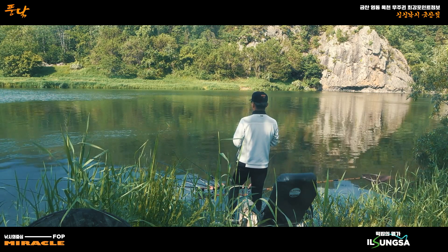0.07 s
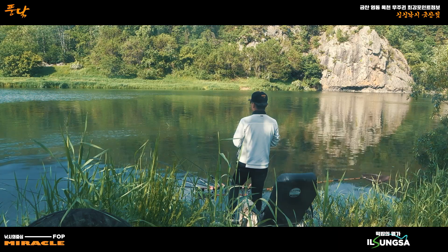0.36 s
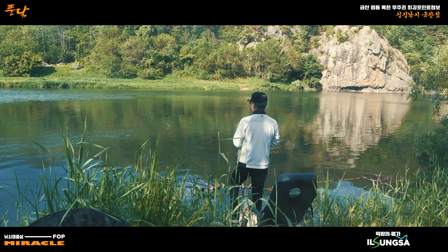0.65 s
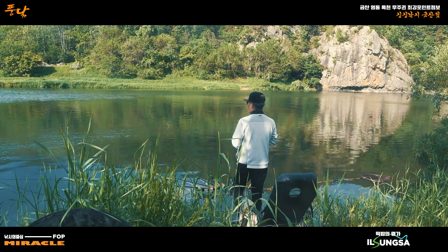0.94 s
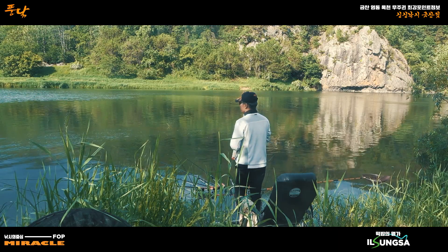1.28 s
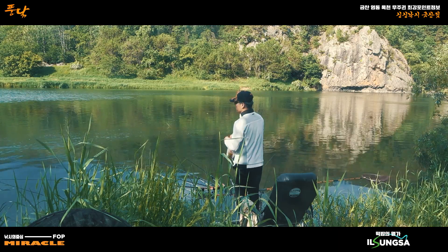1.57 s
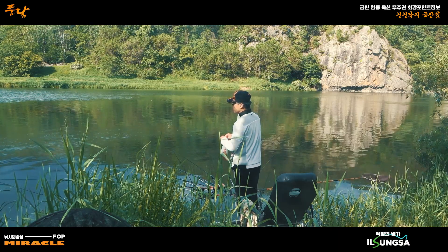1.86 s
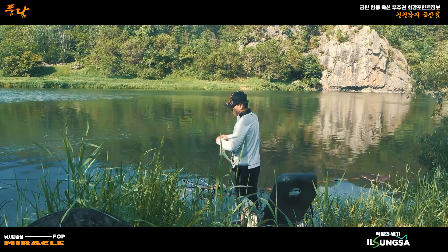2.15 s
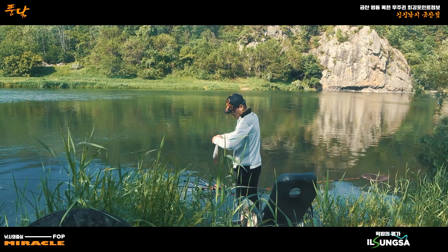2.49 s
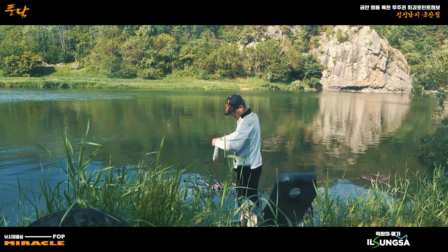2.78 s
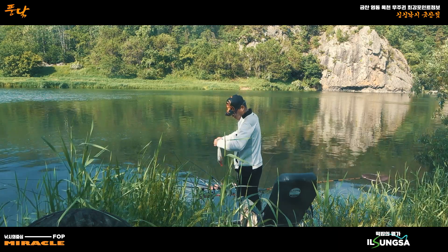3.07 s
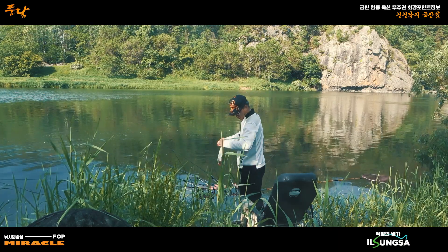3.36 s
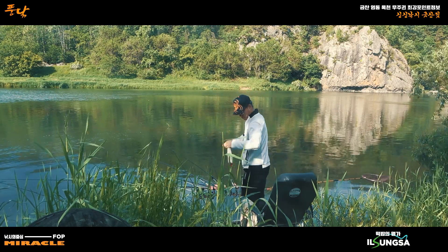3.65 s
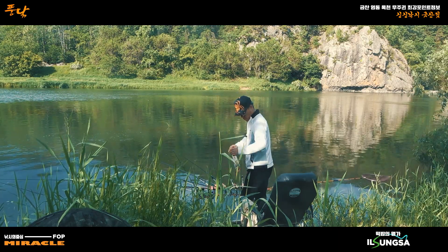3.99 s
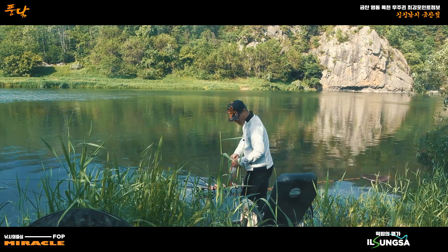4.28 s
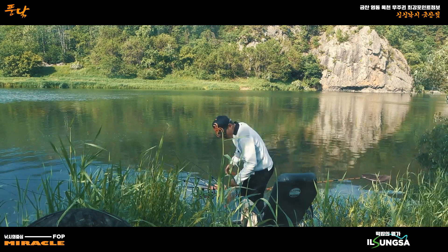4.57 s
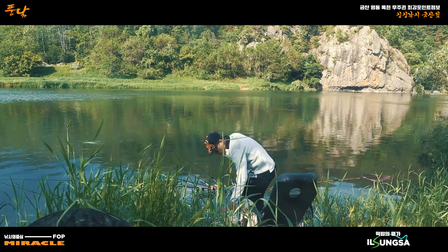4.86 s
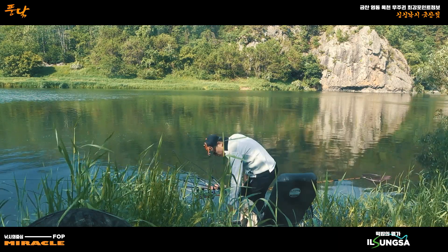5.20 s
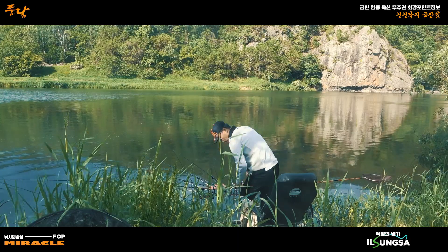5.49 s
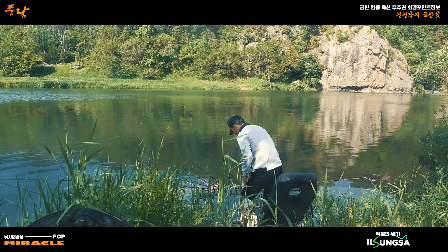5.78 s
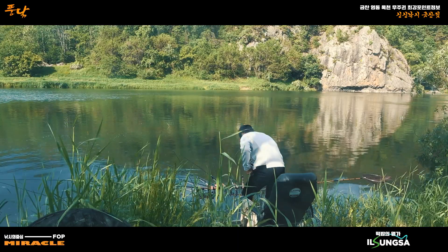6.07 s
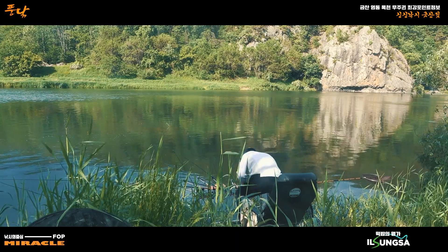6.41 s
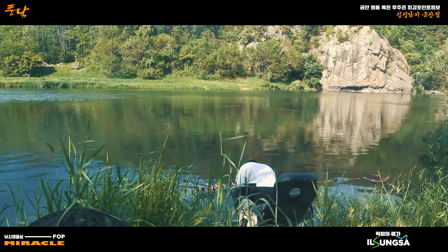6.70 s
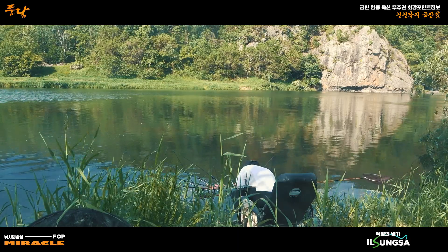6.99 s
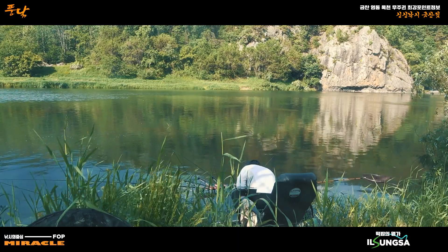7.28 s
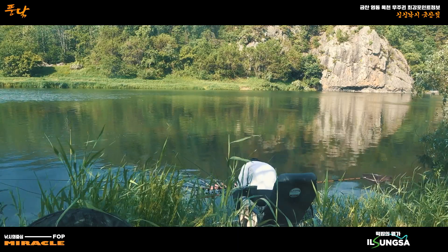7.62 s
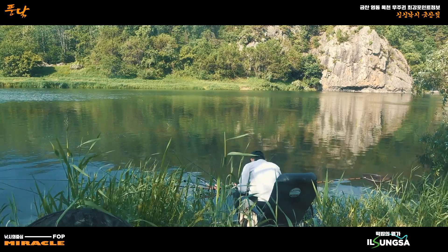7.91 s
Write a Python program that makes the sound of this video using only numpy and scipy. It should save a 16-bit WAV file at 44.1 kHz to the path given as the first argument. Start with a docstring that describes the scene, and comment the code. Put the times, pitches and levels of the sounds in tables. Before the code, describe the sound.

On a windy river bank, reed leaves scrape over cloth and snap crisply right by a microphone worn on a jacket, while gusts rumble against it. The crackling thins out, with one sharp crack after about five seconds. Then come short rasps, soft knocks on the microphone and tiny water plips. The strongest gusts arrive near the end, over a faint murmur of water and foliage.

```python
"""A windy river bank, heard from a small microphone on an angler's jacket, long reed leaves within reach.
For the first six seconds he handles them: leaves and cloth scrape, hiss and snap, and early gusts
buffet the capsule. From about five seconds he crouches: ribbed cloth or stems rasp past, the jacket
bumps the microphone, then water plips at the edge. The strongest gusts come near the end.
Farther off, the bank murmurs faintly throughout."""
import sys
import numpy as np
from scipy import signal
from scipy.fft import rfft, irfft, next_fast_len
from scipy.io import wavfile
from scipy.ndimage import uniform_filter1d, minimum_filter1d, map_coordinates

SR = 44100
rng = np.random.default_rng(int(sys.argv[2]) if len(sys.argv) > 2 else 0)


def transcribe(signal):
    """Save signal, clipped to [-1, 1], as a 16-bit WAV file at the path in sys.argv[1]."""
    frames = np.atleast_2d(signal).T
    limited = np.clip(frames, -1, 1)
    pcm = np.round(limited * 32767).astype(np.int16)
    wavfile.write(sys.argv[1], SR, pcm)


N = 355005
TIME = np.arange(N) / SR

# Strokes of leaves over cloth, close to the microphone; a firm stroke is brighter. Levels are relative.
# start_s, length_s, scrape_db, hiss_db, bright_db
LEAF_STROKES = [(0.0, 0.23, -34, -43.5, -0.5), (0.067, .21, -22.5, -36, 1.5), (0.32, 0.14, -29, -42, -1),
                (0.438, 0.089, -24.5, -44, 0.5), (0.574, .18, -38, -44.5, -3.5), (0.743, .11, -33, -30, 1),
                (0.857, 0.03, -36.5, -43, 5), (0.957, 0.028, -37.5, -50, -1), (1.032, 0.18, -52, -45, -6),
                (1.166, 0.033, -31, -52, 1), (1.266, 0.27, -53.5, -51.5, -3), (1.582, 0.15, -42, -47, -6),
                (1.814, 0.1, -42, -50.5, 1), (2.004, 0.14, -43, -51, -5), (2.277, 0.12, -42, -49.5, -1.5),
                (2.43, 0.087, -52.5, -74, -10), (2.656, 0.16, -38, -48, 2.5), (2.822, 0.14, -39.5, -47, 3),
                (3.016, 0.043, -41.5, -53, -1.5), (3.071, 0.076, -34, -45, 4),
                (3.195, 0.043, -42, -45.5, 1), (3.349, 0.21, -36.5, -43, 2.5),
                (3.72, 0.071, -40, -40.5, 1.5), (3.818, 0.26, -55, -73, -7), (4.023, 0.054, -41.5, -48, 2),
                (4.159, 0.07, -51.5, -76, -13.5), (4.3, 0.062, -39.5, -56, 0.5),
                (4.404, 0.049, -33, -38, 7), (4.469, 0.098, -45.5, -39.5, -0.5),
                (4.59, 0.059, -46.5, -60, 1), (4.73, 0.19, -48, -50, 3), (4.95, 0.12, -56, -59.5, 3),
                (5.063, 0.055, -43, -38.5, 5.5), (5.153, .08, -40.5, -39.5, 9), (5.209, 0.11, -29, -36, 11),
                (5.372, 0.095, -46.5, -46.5, 0), (6.572, .085, -45, -48, -2), (6.647, 0.044, -45, -39.5, 3),
                (7.07, 0.045, -53, -60, -9), (7.229, 0.02, -41, -47.5, -1), (7.31, 0.048, -70, -46, -2),
                (7.572, 0.079, -48, -57, 1)]


def handling():
    """Scrape, hiss and brightness in dB: each stroke rises, holds, drops, and the leaves slide on faintly."""
    attack_s, release_s, linger_s = 0.013, 0.013, 0.15
    linger = amp(-14.5)
    power = np.full((2, N), 1e-10)
    firmness = np.zeros(N)
    for start_s, length_s, scrape_db, hiss_db, bright_db in LEAF_STROKES:
        first = max(round(start_s * SR), 0)
        t = TIME[first:first + SR] - start_s
        after = np.maximum(t - length_s, 0)
        release = (1 - linger) * np.exp(-after / release_s) + linger * np.exp(-after / linger_s)
        envelope = np.clip(t / attack_s, 0, 1) * release
        stroke = (amp([[scrape_db], [hiss_db]]) * envelope) ** 2
        power[:, first:first + SR] += stroke
        firmness[first:first + SR] += bright_db * stroke[0]
    scrape_db, hiss_db = 10 * np.log10(power)
    return scrape_db, hiss_db, firmness / power[0]


# Tone of the scraping blades and of their hissing ribs, at close range: freq_hz, gain_db
SCRAPE_SPECTRUM = [(60, -6), (150, 5), (330, 4), (520, 2.5), (780, -9), (1150, -4), (1700, -9.5),
                   (2500, -13.5), (4000, -22.5), (8000, -47), (16000, -29)]
HISS_SPECTRUM = [(800, -34), (2000, 0), (3500, -5), (5500, 3.5), (8000, -0.5), (10500, -4), (12000, -9),
                 (16000, -18)]


def rubbing(scrape_db, hiss_db, bright_db):
    """Leaves drag in clumps of slips: a dull, crinkly scrape from the blades, a fine hiss from the ribs."""
    grip = np.clip(wobble(110), -1.5, 1.5)
    folds = crinkles(count=4200, centre_hz=1400, cycles=3, spread_db=4)
    friction = slips(per_s=1300, spread_db=1.0, smooth=0.38)
    scrape = coloured(folds + 2.24 * friction, SCRAPE_SPECTRUM) * unit(amp(2.4 * grip))
    # firmer contact shortens the slips and shifts their energy upward
    dull = filtered(scrape, lambda hz: 1 / (1 + (hz / 1000) ** 4))
    scrape = amp(-0.6 * bright_db) * dull + amp(0.46 * bright_db) * (scrape - dull)
    ribs = patchy(slips(per_s=3500, spread_db=5, smooth=0.9), depth_db=2.5, width_bins=5)
    flutter = unit(amp(1.6 * grip + 2.2 * wobble(300)))
    hiss = flutter * coloured(ribs, HISS_SPECTRUM)
    return amp(scrape_db + 4.0) * scrape + amp(hiss_db - 3.5) * hiss


def crinkles(count, centre_hz, cycles, spread_db):
    """Many tiny folds give way, each ringing for a few cycles at its own pitch."""
    start = rng.integers(0, N, (count, 1))
    pitch, strength, sign = np.clip(rng.standard_normal((count, 3)), -2, 2).T[..., None]
    step = np.arange(300)
    turns = centre_hz * np.exp(0.7 * pitch) * step / SR
    decay = np.exp(-turns / cycles) * (1 - step / len(step))
    rings = np.sign(sign) * amp(spread_db * strength) * np.sin(2 * np.pi * turns) * decay
    return unit(np.bincount((start + step).ravel(), rings.ravel(), N)[:N])


def slips(per_s, spread_db, smooth):
    """Tiny stick-slip impulses of uneven size, over a share of smooth friction."""
    sizes = amp(spread_db * np.clip(rng.standard_normal(N), -2, 2)) * rng.choice([-1, 1], N)
    impulses = unit(sizes * (rng.random(N) < per_s / SR))
    return unit(impulses + smooth * rng.standard_normal(N))


# Leaves and folds buckling right by the microphone: start_s, crack_db, crack_hz, flap_db, flap_hz
LEAF_SNAPS = [(.095, -31, 2800, -35, 800), (.123, -51, 2380, -26.5, 900), (.1489, -23, 3300, -15, 526),
              (0.1585, -36, 2300, -23, 620), (.2339, -15, 4080, -25.5, 600), (0.273, -30, 3240, -19, 510),
              (0.288, -25.5, 2580, -17, 470), (0.3652, -60.5, 2800, -17.5, 940),
              (0.3798, -30, 2600, -27, 850), (0.4432, -26, 2850, -24, 420), (0.469, -25, 4240, -23.5, 800),
              (0.526, -23.5, 4800, -23.5, 1010), (0.539, -22, 3790, -17, 824), (.653, -21, 4370, -17, 775),
              (0.689, -41, 2900, -17, 724), (0.7516, -36.5, 2610, -20, 620), (0.8148, -19, 4950, -21, 543),
              (0.8517, -13, 6650, -41, 700), (.8804, -33, 2400, -22.5, 980),
              (0.9338, -32, 3100, -24.5, 1570), (0.9663, -50, 2700, -24, 695),
              (1.0454, -33, 4930, -32.5, 630), (1.206, -30.5, 2380, -23, 595),
              (1.218, -27, 3810, -22, 1160), (1.2434, -26, 3120, -28.5, 1050),
              (1.2706, -34.5, 3600, -33.5, 450), (1.77, -44.5, 5030, -43.5, 700),
              (1.5871, -21, 2840, -36, 590), (1.605, -30.5, 2960, -27.5, 745),
              (1.6135, -27, 3260, -27, 510), (1.6652, -54.5, 2500, -26.5, 442),
              (1.711, -42, 2480, -30, 597), (1.855, -23, 3000, -23.5, 1310), (1.865, -24, 3300, -18, 427),
              (2.0397, -24, 4430, -26, 970), (2.116, -17, 2440, -23.5, 910), (2.211, -43, 4000, -43, 1000),
              (2.2178, -22.5, 6150, -33, 1090), (2.281, -62, 2500, -28, 526),
              (2.3013, -39, 2600, -28.5, 460), (2.3812, -51, 2640, -31, 1120), (2.453, -55, 2600, -36, 695),
              (2.5088, -69, 2470, -37.5, 674), (2.604, -37.5, 2570, -32, 905),
              (2.6772, -41, 2700, -25, 855), (2.689, -34, 2400, -22, 980),
              (2.7053, -25.5, 3040, -25.5, 587), (2.7913, -27.5, 2950, -21.5, 1110),
              (2.8169, -18.5, 3100, -17, 660), (2.863, -28, 3400, -24.5, 586),
              (2.8993, -21.5, 3380, -22.5, 810), (2.962, -35, 3100, -36, 1190),
              (3.0298, -49, 2430, -27, 710), (3.1347, -66, 2300, -26, 720),
              (3.2128, -41.5, 2800, -26.5, 625), (3.2262, -57, 3000, -29, 820),
              (3.286, -47, 3500, -29, 745), (3.305, -24, 3030, -25.5, 840), (3.4581, -31, 4000, -29, 910),
              (3.4717, -25, 4600, -27.5, 680), (3.5842, -28, 4900, -27, 820),
              (3.762, -27.5, 5000, -34.5, 510), (3.8131, -26, 3200, -29, 1340),
              (3.923, -52, 2200, -37.5, 695), (4.1704, -63, 2500, -26.5, 950), (4.223, -66, 2020, -63, 480),
              (4.357, -42, 2300, -26, 1090), (4.399, -29.5, 3300, -28.5, 900),
              (4.4075, -41, 2600, -24, 870), (4.495, -30, 5300, -41, 590), (4.607, -36, 3460, -50, 530),
              (4.6291, -47, 3800, -24, 710), (4.6354, -25.5, 3920, -28.5, 790),
              (5.095, -36, 3230, -32.5, 1150), (5.22, -20, 3800, -28.5, 1560),
              (5.2266, -6, 4300, -22, 1300), (5.3256, -26.5, 2880, -40, 840), (5.4887, -33, 3220, -55, 830),
              (5.5754, -35.5, 3840, -34, 1220), (5.8616, -45.5, 5170, -51, 900),
              (7.8898, -33, 2960, -26, 390)]


def snaps(scrape_db, hiss_db):
    """A leaf creaks under strain, buckles with a sharp crack, then its blade flaps for a few milliseconds."""
    lead_s = 0.012
    out, t = np.zeros(N), np.arange(2600) / SR - lead_s

    def dying(seconds):
        return (t >= 0) * np.exp(-np.abs(t) / seconds)

    strain = (t < 0) * np.exp(-np.abs(t) / 0.0042)
    buckle = dying(0.0008) + 0.05 * dying(0.006) + 0.03 * strain
    blade = dying(0.0038) + 0.053 * strain
    for start_s, crack_db, crack_hz, flap_db, flap_hz in [*LEAF_SNAPS, *ticks(scrape_db, hiss_db)]:
        crack_noise, flap_noise = rng.standard_normal((2, len(t)))
        top_hz = 17600 * 2 ** ((crack_db + 16.5) / 35)  # a crack 35 dB softer is an octave duller
        crack = filtered(crack_noise * buckle, lambda f: resonance(f, crack_hz, q=0.93)
                         / (1 + 1j * f / (3 * crack_hz)) / (1 + (f / top_hz) ** 4))
        flap = filtered(flap_noise * blade, lambda f: resonance(f, flap_hz, q=0.71)
                        * resonance(f, 1076, q=0.56) / (1 + 1j * f / 5000))
        add(out, start_s - lead_s, amp(crack_db) * unit_over(crack, seconds=0.0042))
        add(out, start_s - lead_s, amp(flap_db) * unit_over(flap, seconds=0.0075))
    return out


def ticks(scrape_db, hiss_db, per_s=14, spread_octaves=0.21):
    """Rows of small random buckles, whose strength follows the rubbing of the moment."""
    count = round(per_s * N / SR)
    at = rng.integers(0, N, 400)[:count]
    size_db, crack_pitch, flap_pitch = np.clip(rng.standard_normal((400, 3)), -2, 2)[:count].T
    crack_db = hiss_db[at] + 7.5 + size_db
    crack_hz = 3300 * 2 ** (spread_octaves * crack_pitch)
    flap_db = scrape_db[at] + 5.5 + size_db
    flap_hz = 780 * 2 ** (spread_octaves * flap_pitch)
    return np.column_stack([at / SR, crack_db, crack_hz, flap_db, flap_hz])


# Gusts right on the capsule: time_s, level_db
WIND_GUSTS = [(0.0, -27), (0.22, -34), (0.29, -30), (0.36, -24.5), (0.76, -32), (0.78, -24.5), (1.1, -26.5),
              (1.14, -32), (1.25, -19.5), (1.5, -21.5), (1.52, -18), (1.66, -37), (3.36, -44.5),
              (3.38, -34), (3.59, -38), (3.63, -60), (3.94, -38), (4.89, -44), (4.95, -37), (5.22, -31),
              (5.25, -20), (5.58, -33), (5.63, -26.5), (5.72, -39), (5.83, -34.5), (5.94, -49), (5.96, -37),
              (6.28, -36), (6.7, -13), (6.97, -31.5), (7.17, -24.5), (7.29, -35), (7.53, -22), (7.62, -25),
              (7.78, -11.5), (7.89, -16.5), (7.94, -13.5), (8.05, -17.5)]
# Low rumble of the buffeted microphone: freq_hz, gain_db
BUFFET_SPECTRUM = [(10, -19.5), (25, -2.5), (45, 2.5), (85, -3), (130, -8.5), (200, -23.5), (300, -35.5),
                   (500, -58.5), (1200, -74)]


def wind():
    """Eddies on the capsule; stronger flow makes smaller eddies and so reaches higher."""
    buffet_db = curve(WIND_GUSTS)
    large = coloured(rng.standard_normal(N), BUFFET_SPECTRUM) * unit(amp(2.3 * wobble(16)))
    small = filtered(rng.standard_normal(N),
                     lambda f: resonance(f, 151.5, q=1.09) ** 2 / (1 + (f / 450) ** 2))
    return amp(buffet_db) * large + amp(1.356 * buffet_db - 7.0) * unit(small)


# Tone of the thud that reaches the microphone through the jacket after a snap: freq_hz, gain_db
THUD_SPECTRUM = [(25, -10.5), (70, -2), (180, -5.5), (400, -3.5), (700, -13), (1500, -43), (4000, -64)]


def jostle(scrape_db, rise_s=0.001, decay_s=0.014):
    """Strokes and snaps also shake the jacket, and the microphone rumbles with them."""
    jolts, t = np.zeros(N), np.arange(SR // 5) / SR
    jolt = np.exp(-t / decay_s) * (1 - np.exp(-t / rise_s))
    for start_s, _, _, flap_db, _ in LEAF_SNAPS:
        add(jolts, start_s, amp(flap_db - 6) * jolt)
    rumble = amp(scrape_db - 14.5) * coloured(rng.standard_normal(N), BUFFET_SPECTRUM)
    return rumble + jolts * coloured(rng.standard_normal(N), THUD_SPECTRUM)


# Soft knocks on the microphone itself: start_s, relative_level_db, pitch_hz, t60_s
MIC_BUMPS = [(1.095, -11.5, 225, 0.027), (5.613, -22.5, 186, 0.068), (6.173, -21.5, 203, 0.073),
             (6.232, -31.5, 243, 0.05), (6.423, -27, 193, 0.12), (6.701, -13, 176, 0.034),
             (7.103, -28.5, 277, 0.074), (7.134, -28, 126, .08), (7.461, -28, 176, 0.097),
             (7.655, -36.5, 354, 0.18)]


def bumps(rise_s=0.0016):
    """The jacket nudges the microphone, which thuds on its mount."""
    out, t = np.zeros(N), np.arange(SR // 4) / SR
    for start_s, level_db, pitch_hz, t60_s in MIC_BUMPS:
        fundamental = np.sin(2 * np.pi * pitch_hz * t)
        overtone = 0.18 * np.sin(2 * np.pi * 2.15 * pitch_hz * t) * np.exp(-t / 0.015)
        envelope = amp(level_db + 8.0 - 60 * t / t60_s) * (1 - np.exp(-t / rise_s))
        add(out, start_s, envelope * (fundamental + overtone))
    return out


# Ribbed cloth or stems passing close as he crouches: middle_s, level_db, half_length_s, regularity (0-1)
RASPS = [(5.272, -32.5, 0.044, 0.05), (6.014, -52.5, 0.018, 0.1), (6.2, -57, 0.024, 0),
         (6.4, -52, .03, 0.6), (6.685, -28.5, 0.04, 0.7), (6.737, -35, 0.018, 1),
         (7.071, -32.5, 0.0067, 0.15), (7.417, -44, 0.0084, 0.4), (7.596, -35, 0.011, 0)]
# Tone of their friction: freq_hz, gain_db
RASP_SPECTRUM = [(500, -24), (1350, -13), (1750, -19), (2100, 6.5), (2700, -8.5), (3300, -11.5),
                 (5000, -21), (8000, -21), (15000, -59)]


def rasps(period_s=0.00147, slowing_s=0.05):
    """A ribbed surface rasps past, fastest in the middle, so that its overtones arch up and down."""
    out = np.zeros(N)
    friction = coloured(rng.standard_normal(N) * amp(2.2 * wobble(400)), RASP_SPECTRUM)
    for middle_s, level_db, half_length_s, regularity in RASPS:
        slowing = 0.308 * np.tanh(((TIME - middle_s) / slowing_s) ** 2)
        delay_s = period_s * (1 + slowing + 0.015 * wobble(70))
        # each rib repeats the friction one period later
        ribs = sum(regularity ** k * np.interp(TIME - k * delay_s, TIME, friction) for k in range(4))
        swell = np.exp(-0.5 * ((TIME - middle_s) / half_length_s) ** 2)
        out += amp(level_db) * swell * unit(ribs)
    return out


# Clear bubbles at the water's edge: start_s, relative_level_db, pitch_hz
EDGE_PLIPS = [(5.968, -47.5, 990), (6.146, -40.5, 850), (6.883, -34, 4770), (6.884, -35, 2000),
              (6.986, -35, 3320), (6.997, -48.5, 1920), (7.065, -36, 2250), (7.21, -41, 704),
              (7.339, -44.5, 6750), (7.399, -46, 5970), (7.414, -41, 2110), (7.496, -36, 5200),
              (7.5, -41, 1790), (7.597, -34, 2150), (7.639, -42.5, 4250)]


def plips():
    """A small splash traps a bubble, which rings briefly; lower bubbles ring longer."""
    out, t = np.zeros(N), np.arange(2048) / SR
    for start_s, level_db, pitch_hz in [*EDGE_PLIPS, *fizz(count=20)]:
        decay_s = 0.0024 * (2500 / pitch_hz) ** 0.5
        bubble = np.sin(2 * np.pi * pitch_hz * t) * np.exp(-t / decay_s)
        splash = rng.standard_normal(len(t)) * np.exp(-t / 0.0022)
        spatter = filtered(splash, lambda f: resonance(f, pitch_hz, q=8.8))
        add(out, start_s, amp(level_db - 7) * unit(unit(bubble) + 1.1 * unit(spatter)))
    return out


def fizz(count, from_s=6.2, until_s=7.75, centre_hz=4520, spread_octaves=0.75):
    """Rows of faint bubbles at random moments and pitches."""
    when, size, pitch = rng.random((count, 3)).T
    start_s = from_s + (until_s - from_s) * when
    level_db = -52 + 4 * (2 * size - 1)
    pitch_hz = centre_hz * 2 ** (spread_octaves * (2 * pitch - 1))
    return np.column_stack([start_s, level_db, pitch_hz])


# Breeze in the foliage farther along the bank: time_s, level_db
BANK_BREEZE = [(0, -54.5), (4.5, -51.5), (5.7, -54), (6.5, -48), (8.05, -50.5)]
# Tone of the water and distant leaves: freq_hz, gain_db
BANK_SPECTRUM = [(30, 4.5), (100, -9), (250, -1.5), (500, -8), (1000, -16), (2200, -13.5), (4000, -20),
                 (8000, -23), (13000, -28.5), (16000, -32)]


def bank():
    """Water and far foliage murmur, swelling gently with the breeze."""
    level_db = curve(BANK_BREEZE) + 0.48 * wobble(1.1)
    return amp(level_db) * coloured(rng.standard_normal(N), BANK_SPECTRUM)


def amp(db):
    """Decibels to gain."""
    return 10 ** (np.asarray(db) / 20)


def unit(x):
    """Scaled to rms 1."""
    return x / np.sqrt(np.mean(x ** 2) + 1e-20)


def unit_over(x, seconds):
    """Scaled to the energy of rms 1 held for this long."""
    return x / np.sqrt(np.sum(x ** 2) / (seconds * SR))


def curve(rows):
    """One value per sample from (time_s, value) rows."""
    return np.interp(TIME, *np.transpose(rows))


def wobble(knots_per_s):
    """A smooth random curve."""
    return map_coordinates(rng.standard_normal(N // 20), [TIME * knots_per_s], mode="wrap")


def filtered(x, response):
    """x times a response of frequency."""
    size = next_fast_len(len(x) + 8192)
    return irfft(rfft(x, size) * response(np.fft.rfftfreq(size, 1 / SR)), size)[:len(x)]


def coloured(x, spectrum):
    """x shaped by (freq_hz, gain_db) points on a log axis, at rms 1."""
    freq_hz, gain_db = np.transpose(spectrum)
    return unit(filtered(x, lambda hz: amp(np.interp(np.log(hz + 1), np.log(freq_hz), gain_db))))


def patchy(x, depth_db, width_bins):
    """Random hills and dips in the spectrum that shift from moment to moment."""
    frames = signal.stft(x, nperseg=256)[2]
    hills = uniform_filter1d(rng.standard_normal(frames.shape), size=width_bins, axis=0)
    hills = uniform_filter1d(hills, size=24, axis=1)
    return signal.istft(frames * amp(depth_db * unit(hills)), nperseg=256)[1][:N]


def resonance(f, hz, q):
    """Causal response of one damped mode."""
    return 1j * f * hz / q / (hz * hz - f * f + 1j * f * hz / q)


def add(track, start_s, sound):
    """Mix a sound in at start_s."""
    span = track[max(round(start_s * SR), 0):][:len(sound)]
    span += sound[:len(span)]


def scene():
    """In the open air, everything reaches the one jacket microphone directly."""
    scrape_db, hiss_db, bright_db = handling()
    leaves = rubbing(scrape_db, hiss_db, bright_db) + snaps(scrape_db, hiss_db) + jostle(scrape_db)
    return (leaves + wind() + bumps() + rasps() + plips() + bank())[None]


def record(dry):
    """The recorder's fast limiter dips smoothly around the highest peaks; nothing passes above its band."""
    ceiling, top_hz = 0.52, 16050
    needed = np.minimum(1, ceiling / (np.abs(dry[0]) + 1e-9))
    gain = uniform_filter1d(minimum_filter1d(needed, size=90), size=90)
    return filtered(dry[0] * gain, lambda hz: hz < top_hz)[None]


dry = scene()
out = record(dry)
transcribe(out)
```